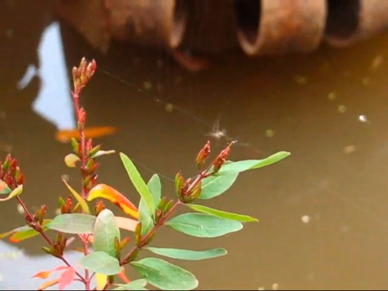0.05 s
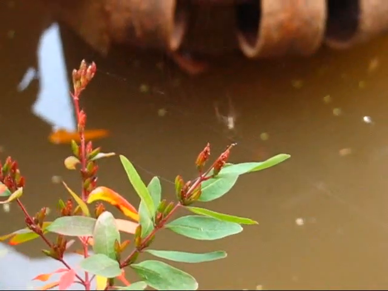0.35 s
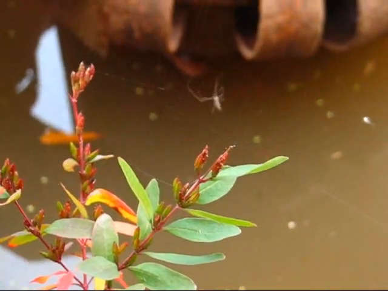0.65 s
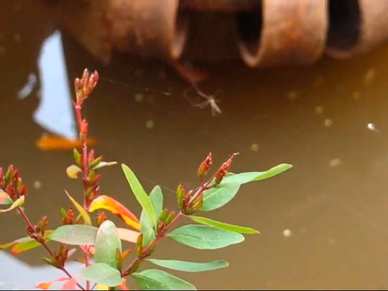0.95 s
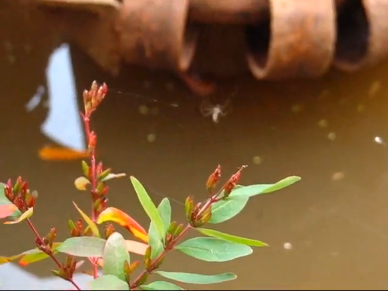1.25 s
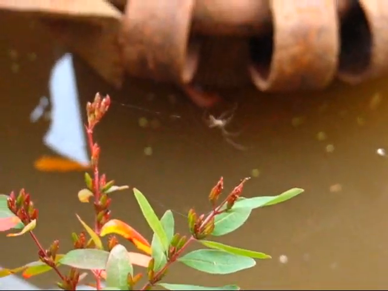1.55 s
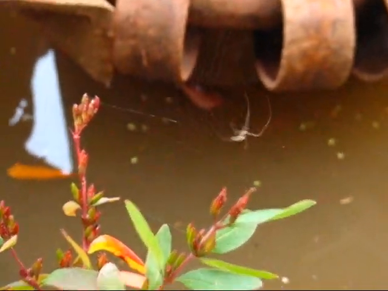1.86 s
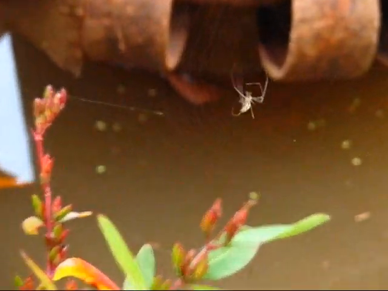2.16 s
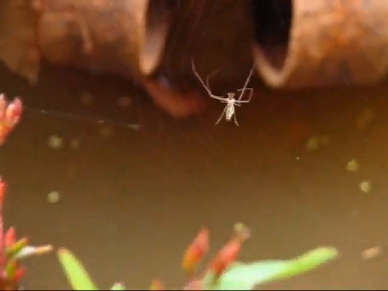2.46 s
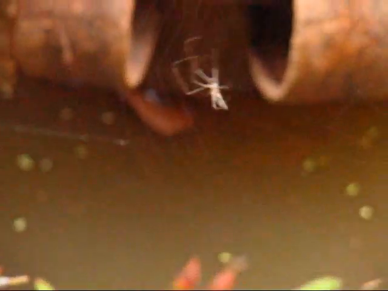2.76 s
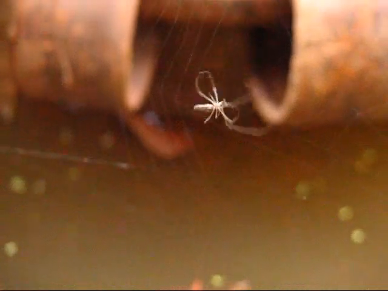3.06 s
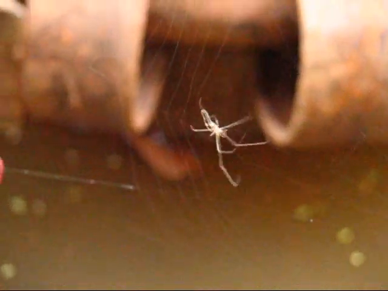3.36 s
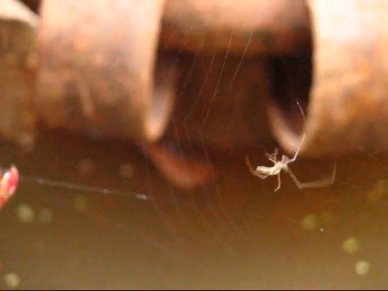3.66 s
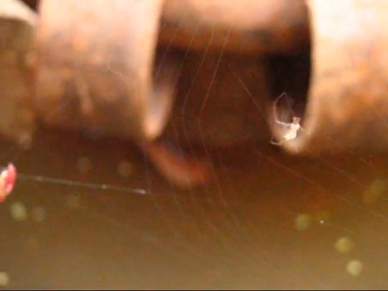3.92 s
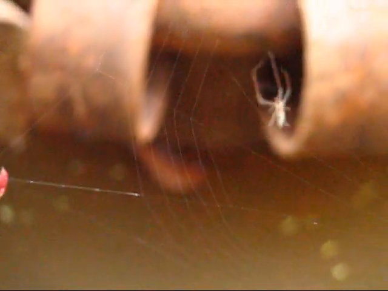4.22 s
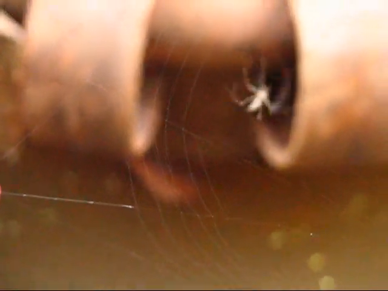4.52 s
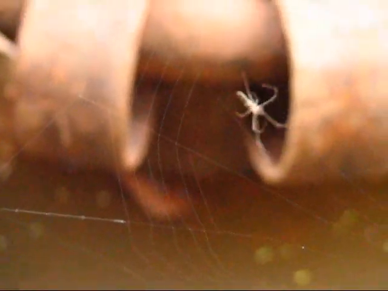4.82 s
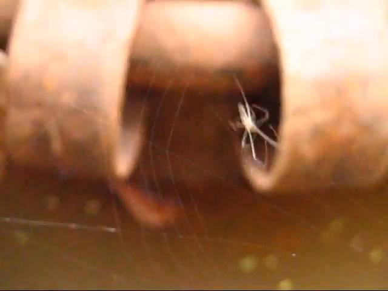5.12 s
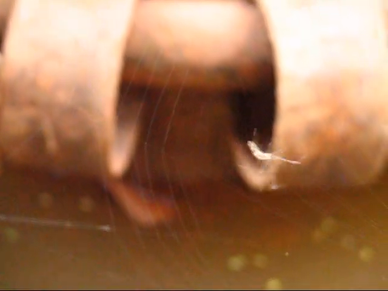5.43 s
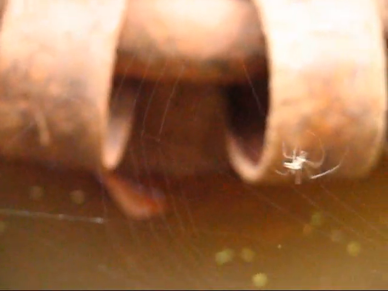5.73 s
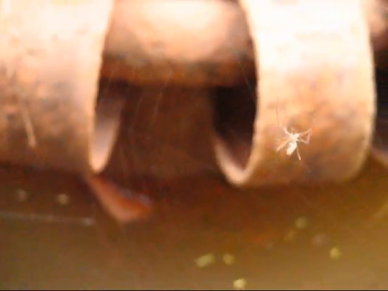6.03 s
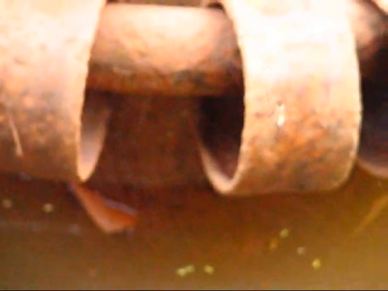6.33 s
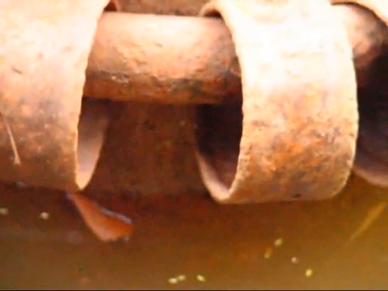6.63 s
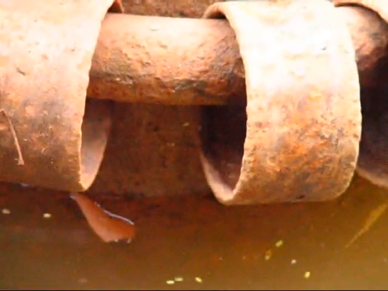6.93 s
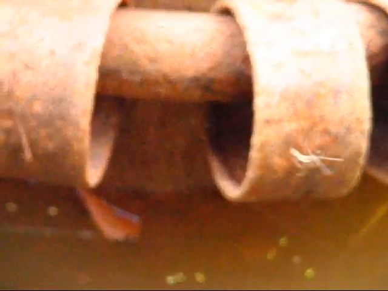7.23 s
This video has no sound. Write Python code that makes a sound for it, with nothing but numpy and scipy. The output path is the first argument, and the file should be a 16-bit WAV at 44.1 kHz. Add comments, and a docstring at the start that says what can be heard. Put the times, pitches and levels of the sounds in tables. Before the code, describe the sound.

After a soft handling knock, high crickets scrape over steady hiss beside a river, with occasional bubble plops and a far bird's falling call. Right at the microphones a zoom lever clicks loudly, and the lens whirrs, scrapes and chirps before knocking to a stop. A nearby cricket ticks and a shrill one joins while the distant chorus dips. A faint low rumble goes by, and the insects and bird continue.

```python
"""A quiet riverbank on a small camera's stereo microphones. Over hiss and a low outdoor wash, a hand
knocks the case; a far bird repeats a falling call, bush crickets scrape their wings, bubbles plop.
At 1.7 s a finger clicks the zoom lever, right by the microphones: gears whirr for a second, the barrel
scrapes and the focus motor chirps until the lens knocks to a stop. A close cricket ticks, a shrill one
joins, and the far chorus lulls around 4 s. A rumble passes at 5 s; crickets and bird carry on."""
import sys
import numpy as np
from scipy import signal
from scipy.fft import rfft, irfft
from scipy.io import wavfile

SR = 44100
rng = np.random.default_rng(int(sys.argv[2]) if len(sys.argv) > 2 else 0)


def persist_wave(psi):
    """Save psi, clipped to +-1, as 16-bit WAV."""
    counts = np.round(np.clip(psi, -1, 1) * 32767).astype(np.int16)
    wavfile.write(sys.argv[1], SR, np.atleast_2d(counts).T)


N = 329868
T = np.arange(N) / SR
HZ = np.fft.rfftfreq(N, 1 / SR)


def amp(db):
    """Decibels to gain."""
    return 10 ** (np.asarray(db) / 20)


def unit(x):
    """Scales to rms 1."""
    return x / np.sqrt(np.mean(x ** 2) + 1e-20)


def curve(points):
    """A spectrum table on the frequency grid."""
    hz, value = np.transpose(points)
    return np.interp(np.log(HZ + 1), np.log(hz), value)


def pan(db):
    """Gains at the two microphones; positive is left."""
    return amp([[db / 2], [-db / 2]])


def hump(hz, octaves):
    """A bell on the log-frequency axis."""
    return np.exp(-.5 * (np.log2((HZ + 1) / hz) / octaves) ** 2)


def noise(gain, same=0):
    """Stereo noise of rms 1 with a given spectrum and likeness at the two microphones."""
    left, other = rng.standard_normal((2, 2 * len(HZ)), dtype=np.float32).view(np.complex64)
    same = np.clip(same, -1, 1)
    right = same * left + np.sqrt(1 - same ** 2) * other
    return unit(irfft((np.array([left, right]) * gain).astype(np.complex64), N))


def blur(width_hz):
    """Low noise that smears a tone into a band when multiplied with it."""
    return noise(np.exp(-.5 * np.minimum(HZ / width_hz, 20) ** 2))


def drift(per_s):
    """A random wander of rms 1."""
    return unit(np.interp(T * per_s, np.arange(4096), rng.standard_normal(4096)))


def swell(peak_s, rise_s, fall_s):
    """A smooth rise to 1 and fall back to 0."""
    return np.exp(-((T - peak_s) / np.where(T < peak_s, rise_s, fall_s)) ** 2)


def swells(rows):
    """The gain of a sound that comes and goes."""
    return sum(amp(db) * swell(peak_s, rise_s, fall_s) for peak_s, rise_s, fall_s, db in rows)


def held(start_s, end_s, fade_s):
    """Fades in, holds at 1, fades out."""
    return np.clip(np.minimum(T - start_s, end_s - T) / fade_s, 0, 1)


def add(mix, s, sound):
    """Lays a stereo sound into the mix at time s."""
    part = mix[:, max(round(s * SR), 0):][:, :sound.shape[1]]
    part += sound[:, :part.shape[1]]


def ring(modes, s, side_db, lead, rise_s=0.00085):
    """A struck part rings briefly, `lead` radians ahead at the left microphone."""
    out, t = np.zeros((2, N)), np.arange(8192) / SR
    phase = np.array([[lead], [0]])
    sound = sum(amp(db - 60 * t / t60) * np.sin(2 * np.pi * hz * t + phase) for hz, db, t60 in modes)
    add(out, s, sound * (1 - np.exp(-t / rise_s)) * pan(side_db))
    return out


# the open air, far off (frequency [Hz], relative level [dB])
WASH_SPECTRUM = [(12, -25), (20, -8), (54, -2.5), (118, -3.5), (197, -2.5), (272, -6), (359, -5),
                 (485, -12.5), (844, -8), (1190, -12), (1890, -14.5), (3080, -15.5), (3700, -17),
                 (5000, -24), (6500, -50), (11000, -120)]
# how alike it is at the two microphones (frequency [Hz], likeness [0-1])
WASH_LIKENESS = [(50, 0.97), (250, 0.91), (560, 0.45), (850, 0.67), (1300, 0.23), (2200, 0.08),
                 (5000, 0.36)]
def wash(level_db=-51.5):
    """The distant wash of the riverside, alike at both microphones in the bass."""
    gain = amp(level_db + .5 * drift(4.19))
    return gain * noise(amp(curve(WASH_SPECTRUM)), curve(WASH_LIKENESS)) * pan(db=-1)


# rumbles, dead centre (peak time [s], rise [s], fall [s], level [dB])
RUMBLE_SWELLS = [(0.5, 0.15, 0.12, -60), (4.5, 0.35, 0.3, -63.5), (5.01, 0.3, 0.26, -49),
                 (6.25, 0.12, 0.15, -58), (7.25, 0.42, 0.35, -59.5)]
def rumble():
    """A low rumble swells and passes."""
    return swells(RUMBLE_SWELLS) * noise(hump(hz=176, octaves=0.26), same=1)


# the microphones' self-noise (frequency [Hz], relative level [dB])
HISS_SPECTRUM = [(3000, -33), (4300, -11.5), (5150, -8), (5550, -1), (5850, 0), (6550, -10), (7250, 0),
                 (7950, 0), (8250, -8), (10300, -4), (12800, -19), (14400, -16), (16000, -6)]
# whine of the electronics, mostly on the left (frequency [Hz], level [dB])
WHINE_TONES = [(5766, -74.5), (7878, -70), (8010, -73.5), (10384, -77)]
def electronics(hiss_db=-48, waver_hz=9):
    """Each microphone hisses on its own, with a few faint wavering tones."""
    hiss = amp(hiss_db) * noise(amp(curve(HISS_SPECTRUM))) * pan(db=1)
    whine = sum(amp(db) * np.sqrt(2) * np.sin(2 * np.pi * np.cumsum(hz + waver_hz * drift(80)) / SR)
                for hz, db in WHINE_TONES)
    return hiss + whine * pan(db=20)


# wings of many crickets, far down the bank (frequency [Hz], relative level [dB])
CHORUS_SPECTRUM = [(6500, -25), (8300, -1.5), (9400, 2.5), (10400, 1), (11600, 0.5), (12900, -1),
                   (14300, 1), (15800, -11)]
def chorus(lull, level_db=-49.5, lull_db=-11, flutter_db=1.43):
    """Far crickets merge into a fluttering fizz that sinks during the lull."""
    return amp(level_db + lull_db * lull + flutter_db * drift(60)) * noise(amp(curve(CHORUS_SPECTRUM)))


# an insect in the distance (peak time [s], rise [s], fall [s], level [dB])
INSECT_SWELLS = [(1.2, 0.4, 0.55, -57.5), (3.1, 0.34, 0.6, -58), (5.5, 0.3, 0.25, -63),
                 (7.25, 0.16, 0.3, -62)]
def far_insect():
    """A soft, narrow buzz drifts in and out."""
    return swells(INSECT_SWELLS) * noise(hump(hz=5880, octaves=0.065))


# a bird, far from the microphones (time [s], level [dB])
BIRD_CALLS = [(-.1, -56), (.9, -59), (2.7, -57), (3.55, -58), (4.44, -58), (5.42, -57.5), (6.47, -57)]
def far_bird(start_hz=3500, fall_hz=800, call_s=.52, fade=.45):
    """A falling call, smeared by distance and echoes into a soft band."""
    out, progress = np.zeros((2, N)), np.linspace(0, 1, int(call_s * SR))
    tone = np.sqrt(2) * np.sin(2 * np.pi * np.cumsum(start_hz - fall_hz * progress) / SR)
    call = tone * signal.windows.tukey(len(tone), .35) * (1 - fade * progress) * np.ones((2, 1))
    for s, db in BIRD_CALLS:
        add(out, s, amp(db) * call[:, max(round(-s * SR), 0):])  # the first call is already under way
    return out * blur(width_hz=340)


# plops at the near edge of the river (time [s], level [dB], starting pitch [Hz])
NEAR_PLOPS = [(1.110, -41.5, 784), (1.307, -52, 1100), (1.435, -40, 1310), (4.27, -43.5, 990),
              (6.012, -38.5, 735), (6.169, -46, 950)]
def water(laps_per_s=7, lap_db=-58, decay_s=0.0037, rise=0.06):
    """Small bubbles ring and rise in pitch: a few near ones among faint lapping."""
    out, t = np.zeros((2, N)), np.arange(2048) / SR
    chance = rng.random((int(laps_per_s * N / SR), 3))
    laps = [(when * N / SR, lap_db + 6 * loud, 550 * 2.47 ** pitch) for when, loud, pitch in chance]
    for s, db, hz in NEAR_PLOPS + laps:
        bubble = np.sin(2 * np.pi * hz * t * (1 + rise * t / t[-1])) * np.exp(-t / decay_s)
        add(out, s, amp(db) * bubble * pan(4 * rng.uniform(-1.4, 1)))
    return out


# two crickets in the grass, near and farther off (start [s], end [s], fade [s], level [dB], strokes [1/s])
NEAR_BOUT = (-1.54, 3, 1, -49, 38)
FAR_BOUT = (1, 8, 0.5, -52.5, 38)
# their wing resonances (frequency [Hz], relative level [dB])
NEAR_WING_SPECTRUM = [(6500, -32), (8500, -6), (10000, -0.5), (11000, -0.5), (12300, -6), (13300, 0),
                      (14300, -3), (15200, -14), (16000, -16)]
FAR_WING_SPECTRUM = [(7000, -37), (8700, -8), (10200, 3), (11800, 3), (12900, 7), (14200, 3), (15300, -10),
                     (16000, -22)]
def cricket(bout, wing, sharpness, side_db, same, waver=0.014):
    """Every wing stroke scrapes a file of teeth: a puff of fizz in the wing's resonances."""
    start_s, end_s, fade_s, level_db, rate = bout
    phase = 2 * np.pi * np.cumsum(rate * (1 + waver * drift(2.98))) / SR
    strokes = unit(np.exp(sharpness * np.cos(phase)))
    gain = held(start_s, end_s, fade_s) * amp(level_db + .5 * drift(27))
    return gain * strokes * noise(amp(curve(wing)), same) * pan(side_db)


# a shrill cricket to the right (time [s], strokes [1/s], level [dB])
SHRILL_BOUT = [(3.31, 13, -55), (3.8, 12.5, -50), (4.05, 9.7, -58), (4.18, 19, -61), (4.6, 27, -55),
               (5.8, 27, -56), (7.48, 28, -55)]
# its wing resonances (frequency [Hz], width [Hz], relative level [dB])
SHRILL_WING_MODES = [(11900, 900, -6), (14200, 650, 2), (14750, 250, -5), (15400, 450, -5)]
def shrill_cricket(stroke_s=0.043, uneven_db=2, waver=0.12):
    """A small cricket with sharply tuned wings: its strokes slow to a stutter, then gather speed."""
    times, rate, db = np.transpose(SHRILL_BOUT)
    cycles = np.cumsum(np.interp(T, times, rate, left=0) * (1 + waver * drift(11))) / SR
    starts = np.diff(np.floor(cycles), prepend=0)
    strokes = signal.oaconvolve(starts, np.hanning(int(stroke_s * SR)), "same")
    wing = sum(amp(peak_db) / (1 + ((HZ - hz) / (width / 2)) ** 2)
               for hz, width, peak_db in SHRILL_WING_MODES)
    return amp(np.interp(T, times, db) + uneven_db * drift(25)) * strokes * noise(wing) * pan(db=-4)


# a cricket close by (time [s], lower resonance [dB], upper resonance [dB], left-right [dB])
WING_TICKS = [(2.438, -53, -45, -3), (2.525, -55, -47, -3), (2.621, -53, -47, -3), (2.822, -53, -48.5, -4),
              (2.947, -58, -49, -4), (3.070, -51, -49, -4), (3.209, -50, -47.5, -4), (3.494, -47, -54, 0),
              (3.622, -53, -51, -2), (3.738, -46.5, -53, 0), (3.831, -49, -55, 0), (3.930, -46, -51, 1),
              (4.033, -48.5, -52, 1), (4.125, -48.5, -52, 0), (4.225, -49, -54, 1), (4.357, -48.5, -52, 0),
              (4.460, -46.5, -52, 0)]
def ticking_cricket(stroke_s=0.043, rasp_db=2):
    """Single raspy strokes ring in the two resonances of the wing."""
    lower, upper = np.zeros((2, 2, N))
    stroke = np.hanning(int(stroke_s * SR))
    for s, lower_db, upper_db, side_db in WING_TICKS:
        add(lower, s - stroke_s / 2, amp(lower_db) * pan(side_db) * stroke)
        add(upper, s - stroke_s / 2, amp(upper_db) * pan(side_db) * stroke)
    lower *= noise(hump(hz=10250, octaves=0.14))
    upper *= noise(hump(hz=13600, octaves=0.083))
    return (lower + upper) * amp(rasp_db * drift(500))


# the camera body, which holds the microphones
# (frequency [Hz], width [Hz], gain [dB], left-right [dB], left-right phase [rad])
BODY_MODES = [(241, 120, -1.5, 1, 0.24), (400, 59, 1.5, -4.5, 0.22), (640, 200, -4.5, 0, 0.42),
              (706, 37, 2, 6, 1.1), (778, 82, 3.5, -2, 0.84), (1073, 60, -1.5, 12, 0.63),
              (1242, 104, 3.5, 2.5, 1.03), (1785, 160, -2, 10, 0.7), (1964, 144, 2.2, 0, 2.06),
              (2790, 680, -2.5, -4.5, 2.45), (3730, 280, -2.5, 5, 2.6), (5760, 2500, -7.5, 2, 1.4)]
def body(hz, damping_hz=0):
    """The body's resonances reach the two microphones out of step; damping widens each one."""
    response = 0
    for k, (mode_hz, width, db, side_db, lead) in enumerate(BODY_MODES):
        microphones = pan(side_db) * np.exp(.5j * lead * np.array([[1], [-1]]))
        resonance = 1j * hz * width / (mode_hz ** 2 - hz ** 2 + 1j * hz * (width + damping_hz))
        response += (-1) ** k * amp(db) * microphones * resonance
    return response


# finger, lever and lens, heard through the body
# (time [s], peak level [dB], centre [Hz], spread [octaves], rattle decay [s])
BODY_KNOCKS = [(0.0133, -35.5, 900, 1.2, 0.016), (0.033, -42, 420, 1.1, 0.0073),
               (0.075, -44, 211, 0.22, 0.016), (1.672, -18, 3200, 1.1, 0.005),
               (1.675, -11.5, 780, 1, 0.0021), (1.687, -21, 1500, 0.54, 0.0044),
               (1.7373, -16.5, 1000, 2.3, 0.005), (1.908, -29.5, 1500, 0.65, 0.0022),
               (2.015, -32, 1250, 0.25, .002), (2.399, -31, 1500, 0.5, .002),
               (2.506, -34, 1250, 0.33, .004), (2.749, -35, 1300, 0.27, .004),
               (2.7718, -21, 9600, 0.11, .0007), (2.7723, -22.5, 1200, 1.6, 0.0022),
               (2.7749, -34, 270, 0.51, 0.004), (2.836, -32, 400, 1.05, 0.0093)]
def knocks(rattle=0.44, size=8192):
    """A blow and a short rattle ring the body, which the fingers damp; a softer contact sounds lower."""
    out, t, hz = np.zeros((2, N)), np.arange(size) / SR, np.fft.rfftfreq(size, 1 / SR)
    response = body(hz, damping_hz=70)
    for s, db, centre_hz, octaves, decay_s in BODY_KNOCKS:
        blow = (t == 0) + rattle * rng.standard_normal(size) * np.exp(-t / decay_s)
        detuning = (hz + 1) / centre_hz - centre_hz / (hz + 1)
        contact = 1 / (1 + 1j * detuning / (2 * octaves)) ** 2
        knock = irfft(rfft(blow) * contact * response)
        add(out, s, amp(db) * knock / abs(knock).max())
    return out


# the case around the microphones (frequency [Hz], level [dB], t60 [s])
CASE_MODES = [(236, -39.5, 0.14), (388, -38.5, 0.094), (480, -36.5, 0.11), (735, -40, 0.073)]
def grip():
    """The case rings dully under the gripping hand."""
    return ring(CASE_MODES, s=0.0215, side_db=0, lead=0.2)


# the lever's spring on the right and its seat on the left (frequency [Hz], level [dB], t60 [s])
SPRING_MODES = [(2140, -21, 0.033), (2420, -13.5, 0.021), (2506, -15, 0.018), (2910, -16, 0.02),
                (3200, -33, 0.02)]
SEAT_MODES = [(470, -32, 0.044), (584, -20, 0.022), (700, -21.5, 0.021), (805, -28, 0.035),
              (1060, -18, 0.033), (1140, -20, 0.034), (1234, -27, 0.033)]
def lever():
    """The zoom lever's click rings its spring, then its seat."""
    spring = ring(SPRING_MODES, s=1.6722, side_db=-6, lead=0.94, rise_s=0.0015)
    return spring + ring(SEAT_MODES, s=1.6755, side_db=10.5, lead=0.6)


# the lever, its rebound and the drive's latch, right by the microphones
# (time [s], crack [dB], rattle [dB], rattle centre [Hz], spread [octaves], left-right [dB])
PLASTIC_SNAPS = [(1.6712, -27, -40, 5600, 0.25, 2), (1.6865, -32, -36, 5600, 0.35, 0),
                 (1.7369, -6, -21, 3450, 0.84, 3.5)]
def snaps(crack_s=0.00082, tail_s=0.0046, rise_s=0.00032, size=4096):
    """Hard plastic edges catch: each a sharp, bright snap and a duller rattle."""
    out, t = np.zeros((2, N)), np.arange(size) / SR
    bright = noise(hump(hz=4350, octaves=0.74) + hump(hz=10700, octaves=0.17), same=0.15)
    for s, crack_db, tail_db, tail_hz, octaves, side_db in PLASTIC_SNAPS:
        crack = amp(crack_db) * np.exp(-t / crack_s) * bright[:, round(s * SR):][:, :size]
        tail = amp(tail_db) * np.exp(-t / tail_s) * noise(hump(tail_hz, octaves), same=0.3)[:, :size]
        add(out, s, (1 - np.exp(-t / rise_s)) * (crack + tail) * pan(side_db))
    return out


# one gear and the lens stop, nearer the right microphone (frequency [Hz], level [dB], t60 [s])
GEAR_MODES = [(1210, -40, 0.15)]
STOP_MODES = [(270, -40, 0.06), (726, -20, 0.077), (770, -24, 0.04), (1154, -27, 0.031), (1380, -30, 0.03),
              (3020, -50, 0.31)]
def lens_rings():
    """One gear sings briefly on the way; the lens rings as it stops."""
    gear = ring(GEAR_MODES, s=2.072, side_db=-19, lead=0.67, rise_s=0.0079)
    return gear + ring(STOP_MODES, s=2.7738, side_db=-6.5, lead=.2)


# the focus motor inside the lens (turning time [s], slowing [s], speeding [s], top tone [Hz], drive [dB])
FOCUS_TURNS = [(1.792, .017, 0, 3015, -28), (1.841, 0.0017, 0.026, 3700, -39),
               (2.064, 0.033, 0.029, 4100, -39), (2.312, .033, .036, 4200, -38),
               (2.552, .03, 0.04, 4100, -37.5)]
# resonances of its mount (frequency [Hz], width [Hz], gain [dB])
MOUNT_MODES = [(1650, 300, -8), (2150, 430, -1), (2760, 530, -3), (3800, 450, -12)]
def focus_motor(slow_hz=1634, rasp=0.49, lead=1.55, bend=1.7, jitter=0.072, rattle=0.95):
    """A stepping motor slows, turns and speeds up: its raspy tone flares in the mount's resonances."""
    out = np.zeros((2, N))
    for turn_s, slowing_s, speeding_s, top_hz, db in FOCUS_TURNS:
        away = np.r_[np.linspace(1, 0, int(slowing_s * SR)), np.linspace(0, 1, int(speeding_s * SR))]
        step_hz = slow_hz + (top_hz - slow_hz) * away ** bend
        step_hz *= 1 + jitter * drift(1484)[:len(away)]
        phase = 2 * np.pi * np.cumsum(step_hz) / SR + np.array([[0], [lead]])
        steps = np.sqrt(2) * np.sin(phase) + rattle * rng.standard_normal(phase.shape)
        add(out, turn_s - slowing_s, amp(db) * steps * signal.windows.tukey(len(away), .2))
    out *= unit(1 + rasp * drift(1600))
    mount = sum((-1) ** k * amp(db) * 1j * HZ * width / (hz ** 2 - HZ ** 2 + 1j * HZ * width)
                for k, (hz, width, db) in enumerate(MOUNT_MODES))
    return irfft(rfft(out) * mount, N) * pan(db=-2)


# the lens barrel, nearer the left microphone (time [s], level [dB])
BARREL_SCRAPES = [(1.925, -49), (2.43, -48.5)]
def barrel_scrapes(start_hz=7400, end_hz=9700, scrape_s=0.095, rasp_db=3, overtone=1.38):
    """Once in each turn the barrel scrapes: two scratchy bands that sweep upward together."""
    out = np.zeros((2, N))
    phase = 2 * np.pi * np.cumsum(np.linspace(start_hz, end_hz, int(scrape_s * SR))) / SR
    sweep = (np.sin(phase) + amp(db=-3) * np.sin(overtone * phase)) * signal.windows.tukey(len(phase), .4)
    for s, db in BARREL_SCRAPES:
        add(out, s, amp(db) * sweep * pan(db=9))
    return out * blur(width_hz=750) * amp(rasp_db * drift(400))


def barrel_sizzle(running, scratch_db=2):
    """The sliding lens barrel rubs with a scratchy sizzle."""
    spectrum = (hump(hz=9480, octaves=0.08) + amp(db=-6) * hump(hz=8300, octaves=0.68)
                + amp(db=-10) * hump(hz=12400, octaves=0.09))
    return (noise(spectrum, same=0.28) * amp(scratch_db * drift(350)) * pan(db=7))[:, running]


# meshing gears, centimetres from the microphones (frequency [Hz], level re whirr [dB], left-right [dB])
MESH_TONES = [(821, -19, -1), (1216, -20, -9), (1720, -14.5, 9), (2750, -21, 0)]
def gears(running, teeth_per_s=520, grain_db=3.5, rub=0.85, judder_db=1, wobble=0.0143):
    """Gear teeth tick and rub through the camera body, and hum as they mesh."""
    count = running.stop - running.start
    teeth = (rng.random(count) < teeth_per_s / SR) * rng.choice([-1, 1], count)
    teeth = teeth * amp(grain_db * np.minimum(rng.exponential(1, count), 3))
    # plastic teeth are soft: their ticks carry little treble
    ticks = signal.lfilter(*signal.butter(2, 4500, fs=SR), unit(teeth))
    drive = ticks + rub * rng.standard_normal((2, count))
    body_impulse = irfft(body(np.fft.rfftfreq(4096, 1 / SR)))
    whirr = unit(signal.oaconvolve(drive, body_impulse, axes=1)[:, :count])
    whirr *= amp(judder_db * drift(200)[running])
    wobbly_time = np.cumsum(1 + wobble * drift(60)[running]) / SR
    hum = sum(amp(db) * pan(side_db) * np.sqrt(2) * np.sin(2 * np.pi * hz * wobbly_time)
              for hz, db, side_db in MESH_TONES)
    return whirr + hum


def zoom(start_s=1.675, end_s=2.795, turn_s=0.504, rub_peak_s=1.986, gears_db=-45, barrel_db=-49.5):
    """The drive runs once, straining as it starts; the barrel rubs twice a turn and loads the gears."""
    out, running = np.zeros((2, N)), slice(int(start_s * SR), int(end_s * SR))
    rubbing = np.cos(4 * np.pi * (T[running] - rub_peak_s) / turn_s)
    strain_db = 4.5 * np.exp((start_s - T[running]) / 0.21)
    add(out, start_s, amp(gears_db + 1.05 * rubbing + strain_db) * gears(running))
    add(out, start_s, amp(barrel_db + 3 * rubbing) * barrel_sizzle(running))
    return out * held(start_s, end_s, fade_s=0.011)


def scene():
    """Riverbank life around the camera's own small noises."""
    lull = swell(peak_s=4.01, rise_s=0.77, fall_s=0.99)
    near = cricket(NEAR_BOUT, NEAR_WING_SPECTRUM, sharpness=0.49, side_db=-2.5, same=-0.2)
    far = cricket(FAR_BOUT, FAR_WING_SPECTRUM, sharpness=1, side_db=-3, same=-0.41)
    far *= amp(-7 * lull)  # eases off with the chorus
    river = wash() + rumble() + water()
    grass = near + far + shrill_cricket() + ticking_cricket()
    distance = chorus(lull) + far_insect() + far_bird()
    lens = snaps() + zoom() + barrel_scrapes() + focus_motor() + lens_rings()
    return river + grass + distance + electronics() + knocks() + grip() + lever() + lens


def record(dry, edge_hz=15750):
    """The camera's band limit cuts the highest treble."""
    lowpass = signal.firwin(511, edge_hz, window=("kaiser", 9), fs=SR)
    return signal.oaconvolve(dry, lowpass[None], "same")


dry = scene()
out = record(dry)
persist_wave(out)
```